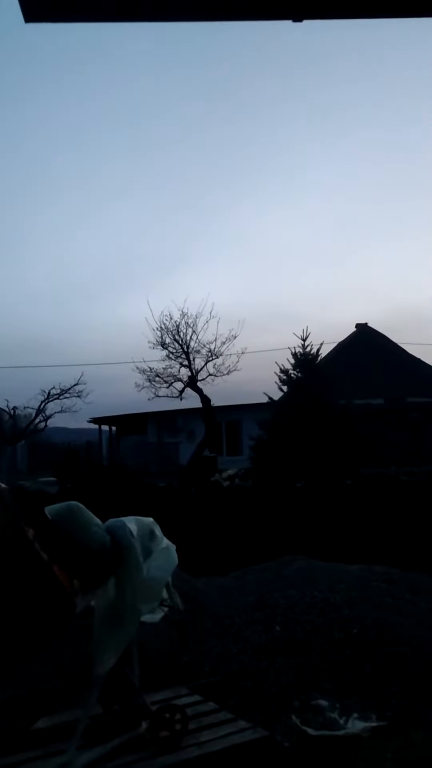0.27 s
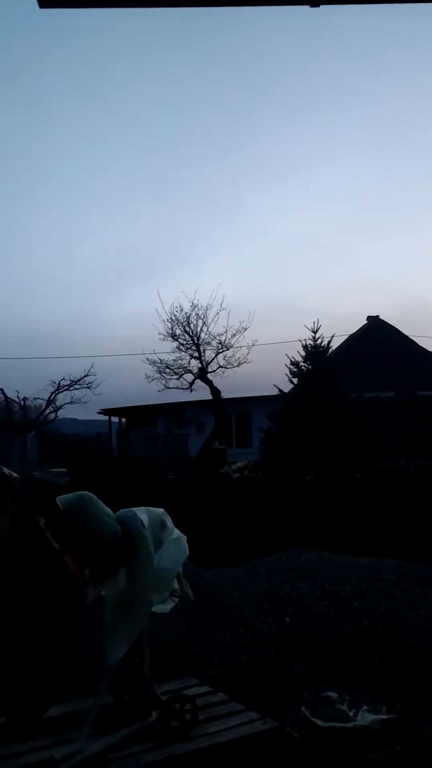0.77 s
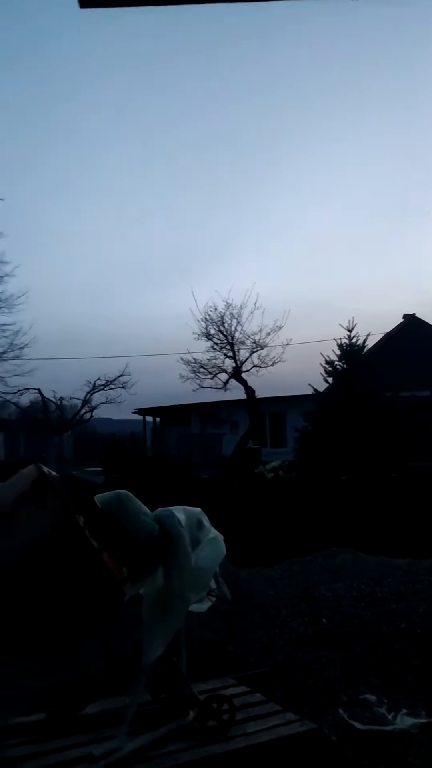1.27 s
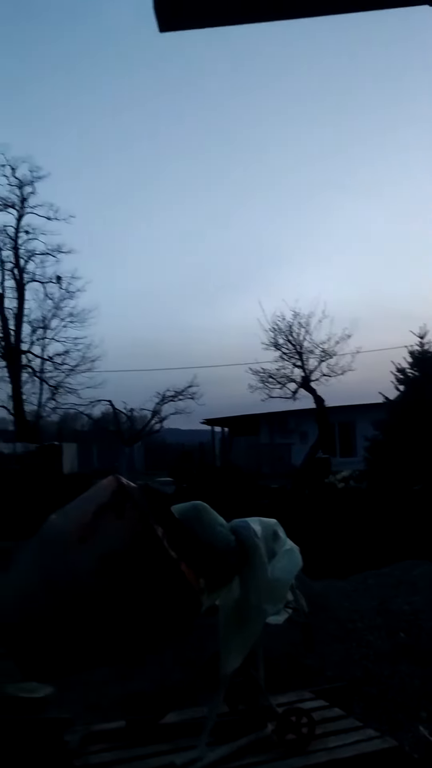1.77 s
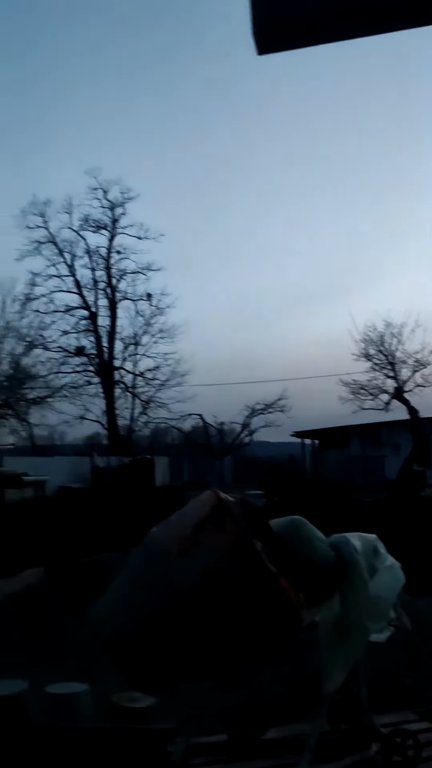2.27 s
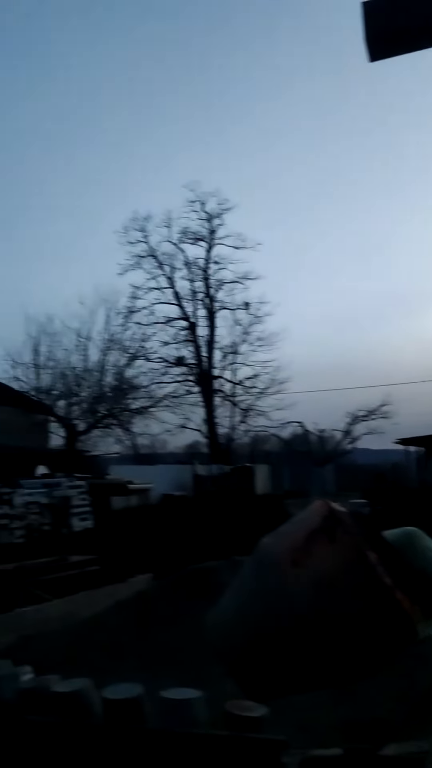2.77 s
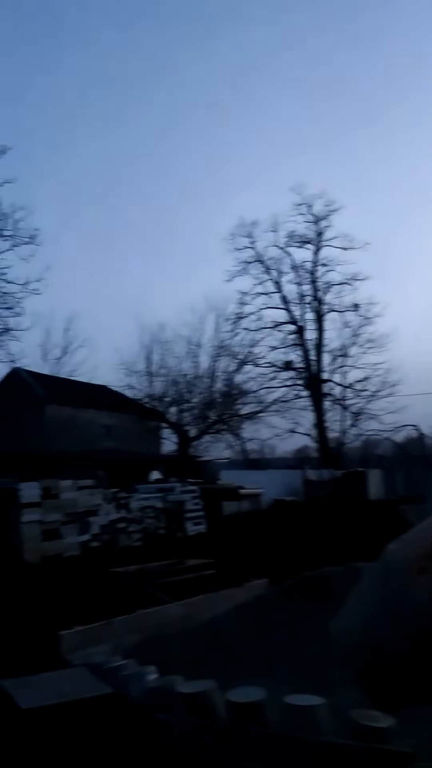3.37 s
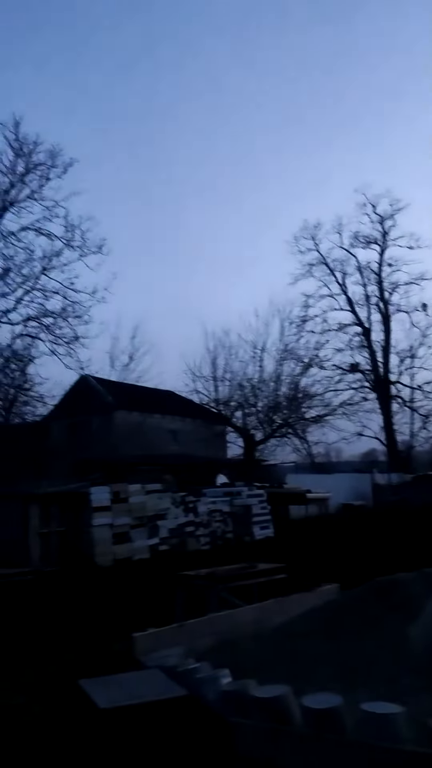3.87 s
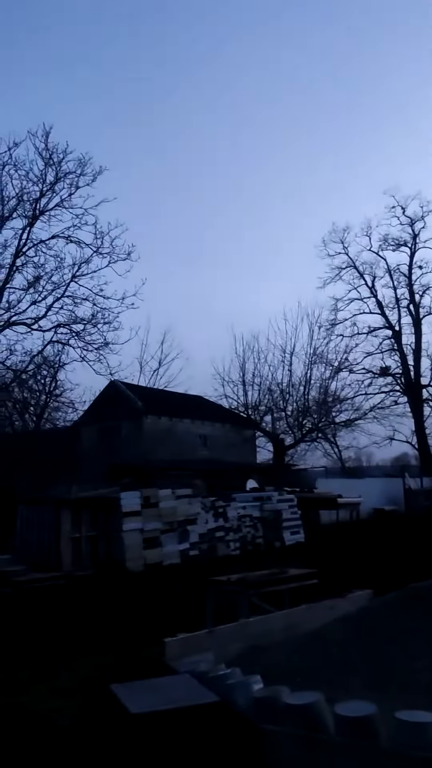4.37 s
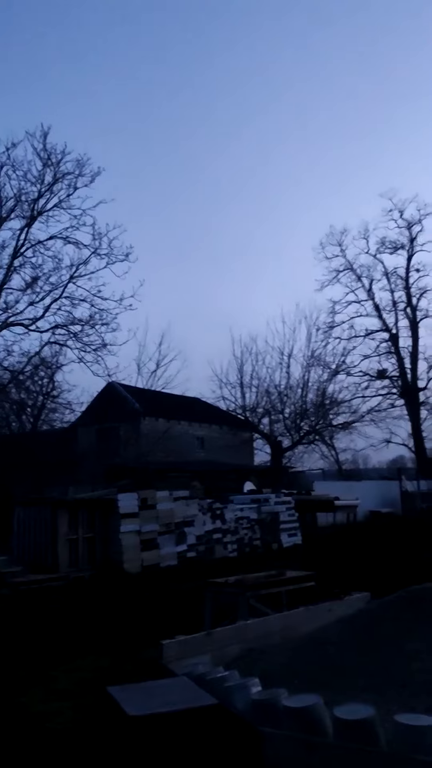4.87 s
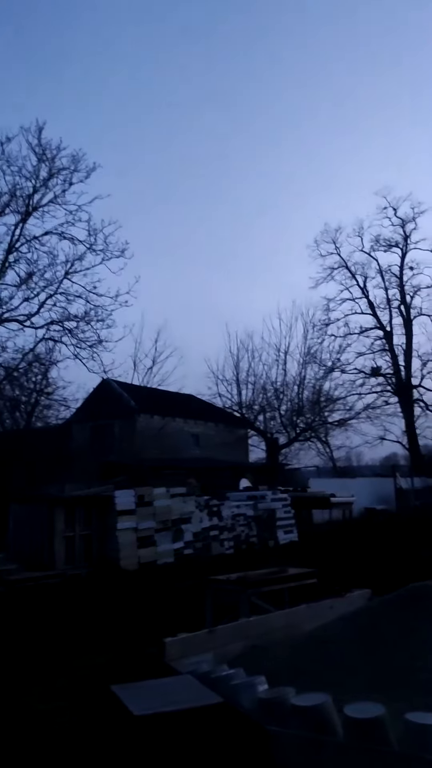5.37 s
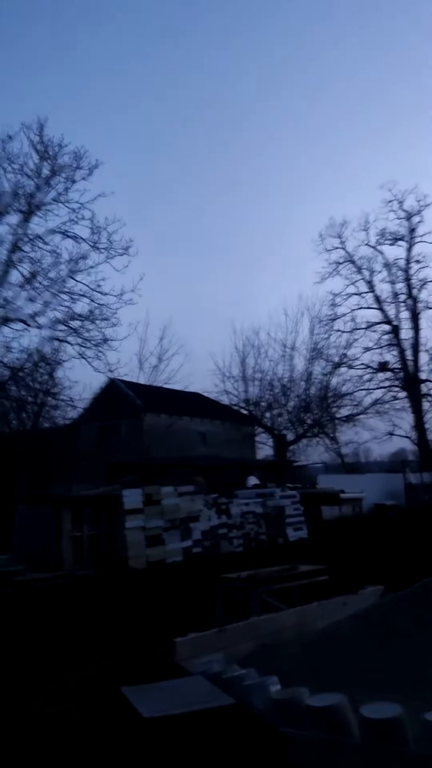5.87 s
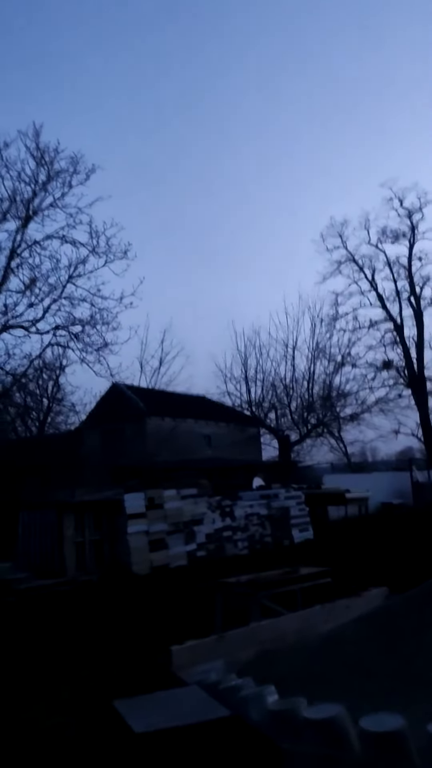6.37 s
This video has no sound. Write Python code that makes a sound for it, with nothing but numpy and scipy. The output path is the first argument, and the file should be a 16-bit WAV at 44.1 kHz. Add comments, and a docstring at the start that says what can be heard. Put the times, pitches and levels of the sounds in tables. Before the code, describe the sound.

Outdoors on a phone microphone, almost no background: only very faint hiss, low hum and flickering noise. A single nightingale gives a brief squeak, two long pure whistles sliding down, three ticked pairs of high-to-low plops, then a regular run of bouncing falling drops. A sharp, slowing high buzz takes over and a rough little up-and-down whistle ends the song, leaving a short, faint echo.

```python
"""In a yard at dusk a nightingale sings one phrase: a squeak, two falling whistles and three double drops, each
led by a tick, a trill, a high buzz and a last rasping slide. Notes are gliding sines with overtones that
grow with loudness; the buzz is a pulsed chirp and the rasp a set of side lines. Nearby walls and far
buildings echo the song. The phone samples slowly, so the treble is mirrored, and its noise suppressor turns
down faint sound and the ends of the echoes; noise bands, hum, rumble and hiss are faint beneath."""
import sys
import numpy as np
from scipy import signal
from scipy.fft import rfft, irfft
from scipy.io import wavfile
from scipy.ndimage import uniform_filter1d

SR = 44100
rng = np.random.default_rng(int(sys.argv[2]) if len(sys.argv) > 2 else 0)


def log_audio(samples):
    """Write samples as a 16-bit WAV file to the path given in sys.argv[1]."""
    # one column per channel
    frames = np.atleast_2d(samples).T
    # limit to full scale, then quantise
    limited = np.clip(frames, -1, 1)
    pcm = np.round(limited * 32767).astype(np.int16)
    wavfile.write(sys.argv[1], SR, pcm)


N = 292383  # samples


def from_db(db):
    """Level-amplitude relation: decibels to gain."""
    return 10 ** (np.asarray(db) / 20)


def in_time(rows, column):
    """Linear interpolation: one column of a curve at every sample."""
    return np.interp(np.arange(N) / SR, np.array(rows)[:, 0], np.array(rows)[:, column])


def at_hz(points, hz):
    """Logarithmic pitch scale: a spectrum read on a log-frequency axis."""
    points = np.array(points)
    return np.interp(np.log(np.maximum(hz, 1)), np.log(points[:, 0]), points[:, 1])


def drift(rate_hz, size):
    """Band-limited noise: smooth random change with a spread of about 1."""
    low_pass = signal.butter(4, rate_hz, fs=SR, output="sos")
    slow = signal.sosfilt(low_pass, rng.standard_normal(size + SR // 5))
    return slow[SR // 5:] / np.sqrt(2 * rate_hz / SR)  # without the filter's start


def band_pass(x, low_hz, high_hz, order):
    """Frequency selection: passes one band."""
    return signal.sosfilt(signal.butter(order, [low_hz, high_hz], "band", fs=SR, output="sos"), x)


# Low hum of the recorder: (frequency [Hz], rms level [dB])
HUM_LINES = [(37.7, -83), (75.4, -95)]
RUMBLE_DB, HISS_DB = -97, -99


def recorder_noise():
    """Self-noise: unsteady sines sharing one wavering clock, low-passed rumble and white hiss."""
    turns = np.arange(N) / SR + .004 * drift(3.5, size=N)
    hum = sum(np.sqrt(2) * from_db(db + 1.5 * drift(4, size=N)) * np.sin(2 * np.pi * hz * turns)
              for hz, db in HUM_LINES)
    rumble = from_db(RUMBLE_DB) * drift(160, size=N)
    return hum + rumble + from_db(HISS_DB) * rng.standard_normal(N)


# Faint flickering noise that leaks through the suppressor, with its level before it:
# (start [s], end [s], centre [Hz], width [Hz], level [dB])
LEAK_BANDS = [(0.064, 0.304, 1990, 443, -73.5), (0.276, 0.542, 970, 253, -74),
              (0.442, 1.069, 2040, 380, -68.5), (0.701, 1.049, 1495, 132, -76),
              (5.881, 6.095, 1870, 300, -71.5)]


def leaks():
    """Band-limited noise: narrow bands whose levels flicker."""
    out = np.zeros(N)
    for start, end, hz, width_hz, db in LEAK_BANDS:
        size, at = int((end - start) * SR), int(start * SR)
        noise = band_pass(rng.standard_normal(SR), hz - width_hz / 2, hz + width_hz / 2, order=3)[:size]
        level = from_db(db + 1.1 * drift(7.3, size=size))
        out[at:at + size] += level * signal.windows.tukey(size, .2) * noise / noise.std()
    return out


def taps(rows, size):
    """Impulse response of discrete reflections: the direct sound plus echoes as clicks."""
    out = np.zeros(size)
    out[0] = 1
    for s, db in rows:
        out[round(s * SR)] += from_db(db)
    return out


# Reflections close to the microphone: (delay [s], level [dB])
NEAR_ECHOES = [(.0033, -23.5), (.007, -22), (.0115, -17), (.0155, -24.5), (.019, -27.5), (.0235, -26),
               (.029, -38.5), (.062, -32.5)]
# Reflections from far walls, before their band filter: (delay [s], level [dB])
FAR_ECHOES = [(.168, -43.5), (.2271, -40), (.2379, -32.5), (.247, -40), (.4077, -29.5), (.4663, -44.5),
              (.603, -47.5)]
# Scattered sound, with late answers from two rows of buildings, before filtering:
# (delay [s], starting level [dB], decay time to -60 dB [s])
SCATTER_DECAYS = [(0, -40, 0.14), (0, -61.5, 1.76), (0.223, -61.5, 0.17), (.4, -70.5, 0.11)]
# Far walls return the middle of the song: (low edge [Hz], high edge [Hz])
WALL_BAND = [2200, 4400]
SCATTER_LOW_HZ, AIR_CUT_HZ = 900, 8200


def yard(x):
    """Image sources and diffuse decay: near walls echo each arrival; leaves and roofs scatter, air dulls."""
    t = np.arange(int(1.6 * SR)) / SR
    walls = taps(FAR_ECHOES, size=len(t))
    walls[0] = 0  # the direct sound is restored below, unfiltered
    spread = sum(from_db(db - 60 * (t - s) / t60) * np.clip((t - s) / 0.013, 0, 1)
                 for s, db, t60 in SCATTER_DECAYS)
    scattered = spread * rng.standard_normal(len(t))
    arrivals = band_pass(scattered, SCATTER_LOW_HZ, AIR_CUT_HZ, order=1)
    arrivals += band_pass(walls, *WALL_BAND, order=2)
    arrivals[0] = 1
    response = signal.fftconvolve(arrivals, taps(NEAR_ECHOES, size=SR // 10))
    return signal.fftconvolve(x, response)[:N]


ATTACK_FROM_DB = -21.5


def glide(start_hz, rest_hz, glide_s, attack_s, held_s, fade_db_per_s, length_s):
    """Exponential relaxation: pitch falls to rest; level rises, holds, then fades linearly in decibels."""
    s = np.linspace(0, length_s, num=100)
    attack = ATTACK_FROM_DB * np.maximum(1 - s / attack_s, 0)
    fade = fade_db_per_s * np.maximum(s - held_s, 0)
    hz = rest_hz + (start_hz - rest_hz) * np.exp(-s / glide_s)
    return np.transpose([s, hz, attack - fade])


# Levels of the second and third harmonic before growth and band shaping
OVERTONE_DB, THIRD_DB = -42, -48
OVERTONE_GROWTH = 0.45  # extra dB of overtone for each dB of note level
LONG_NOISE, SHORT_NOISE = .15, 0.81  # depth of noise modulation in the overtones of long and of short notes
ROUGH_SOFT, ROUGH_LOUD = .35, .05  # the same in the tone of ticks and pips, and of drops


def sing(shape, starts, overtone_noise, rough=0, detune=0.015):
    """Level-dependent harmonics: a gliding sine in row 0, its overtones in row 1, at each (time [s], level [dB])."""
    out = np.zeros((2, N))
    s, hz, db = np.transpose(shape)
    t = np.arange(int(s[-1] * SR)) / SR
    size = len(t)
    soft_ends = np.sin(np.pi / 2 * np.clip(np.minimum(t / .0014, (s[-1] - t) / .003), 0, 1)) ** 2
    turns = np.cumsum(np.interp(t, s, hz)) / SR
    envelope = soft_ends * uniform_filter1d(from_db(np.interp(t, s, db)), size=size // 40 + 1)
    for (at_s, level_db), (tune, phase) in zip(starts, rng.standard_normal((len(starts), 2))):
        angle = 2 * np.pi * (turns * (1 + detune * tune) + phase)
        gain = from_db(level_db) * envelope
        tone = np.sin(angle) * (1 + rough * drift(150, size=size))
        overtones = from_db(OVERTONE_DB) * np.sin(2 * angle) + from_db(THIRD_DB) * np.sin(3 * angle)
        overtones = overtones * gain ** OVERTONE_GROWTH * (1 + overtone_noise * drift(500, size=size))
        at = round(at_s * SR)
        out[:, at:at + size] += gain * [tone, overtones]
    return out


# Bands that shape the overtones of short notes: (centre [Hz], width [Hz], gain [dB])
SHORT_NOTE_BANDS = [(4380, 950, -0.5), (5780, 440, 1.5), (6770, 440, 4), (7400, 350, -1.5),
                    (8700, 1000, -10)]
# Bands that shape the overtones of long notes: (centre [Hz], width [Hz], gain [dB])
LONG_NOTE_BANDS = [(5650, 650, 6), (7400, 770, 9), (8500, 700, 5)]
FLUTTER_DB = 1.13  # spread of the breath's level
HAZE_DB, HAZE_T60_S = -37, 0.55


def colour(notes, bands):
    """Spectral shaping: bands shape the overtones, a faint treble haze of noise follows; breath flutters the tone."""
    overtones = sum(from_db(db) * band_pass(notes[1], hz - width_hz / 2, hz + width_hz / 2, order=3)
                    for hz, width_hz, db in bands)
    t = np.arange(SR // 2) / SR
    haze = from_db(HAZE_DB - 60 * t / HAZE_T60_S) * rng.standard_normal(len(t))
    overtones += signal.fftconvolve(overtones, haze)[:N]
    return notes[0] * from_db(FLUTTER_DB * drift(110, size=N)) + overtones


# Opening squeak: (time [s], pitch [Hz], level [dB])
SQUEAK_SHAPE = [(0, 4755, -67), (.008, 4400, -42), (.016, 4010, -31), (.028, 3922, -30),
                (.033, 4350, -27.5), (.036, 5210, -31.5), (.039, 6240, -38)]


def squeak():
    """Frequency modulation: the pitch dips, then sweeps up."""
    return sing(SQUEAK_SHAPE, [(.542, 0)], LONG_NOISE, detune=0)


# Tick: (start pitch [Hz], resting pitch [Hz], glide constant [s], attack [s], held until [s],
# fade [dB/s], length [s]); the drops and pip below have the same columns
TICK_SHAPE = (2700, 1880, .002, 0.0014, 0.0036, 2900, 0.0093)
# When ticks sound: (time [s], level [dB])
TICK_TIMES = [(0.828, -49.5), (1.438, -25.5), (2.1415, -18.5), (2.5487, -18), (2.9034, -16)]


def ticks():
    """Damped transient: a very short falling pip leads each whistle and each double drop."""
    return sing(glide(*TICK_SHAPE), TICK_TIMES, SHORT_NOISE, ROUGH_SOFT)


# Two whistle openings, each a list of (time [s], pitch [Hz], relative level [dB])
WHISTLE_OPENINGS = [
    [(0, 3806, -56.5), (.012, 3762, -21.5), (.031, 3836, -15.5), (.052, 3790, -10.5), (.064, 3645, -24.5)],
    [(0, 3856, -34), (.012, 3798, -18), (.03, 3660, -8), (.042, 3586, -13.5), (.068, 3577, -12.5),
     (.078, 3616, -24)],
]
# The fall both run into: (time [s], pitch [Hz], relative level [dB])
SHARED_FALL = [(0.112, 3493, -26.5), (0.148, 3260, -26), (.18, 2918, -10), (.2, 2720, -9.5),
               (.212, 2380, -7), (.22, 2025, -19.5), (0.226, 1789, -28.5)]
# When they sound: (time [s], level [dB], length of the fall [share])
WHISTLE_TIMES = [(.979, -2.5, 0.96), (1.61, 0.0, 1)]


def whistles():
    """Near-sinusoidal phonation: each opening runs into one falling glide, its length scaled."""
    out = np.zeros((2, N))
    first = SHARED_FALL[0][0]
    for opening, (at, db, share) in zip(WHISTLE_OPENINGS, WHISTLE_TIMES):
        fall = [(first + share * (s - first), hz, level) for s, hz, level in SHARED_FALL]
        out += sing(opening + fall, [(at, db)], LONG_NOISE, detune=0)
    return out


# Columns as for the tick
HIGH_DROP_SHAPE = (3660, 2293, .0024, .0028, .008, 1100, 0.013)
LOW_DROP_SHAPE = (2040, 944, 0.01, 0.0018, .006, 1390, 0.072)
# When the pairs sound: (time of the high drop [s], level [dB])
DOUBLE_TIMES = [(2.238, -7), (2.6473, -6.5), (3.0012, -7)]
LOW_AFTER_S, LOW_DB = .0245, -4  # low drop relative to the high one


def double_drops():
    """Successive relaxation: a high falling note, then a low one."""
    low_times = np.add(DOUBLE_TIMES, (LOW_AFTER_S, LOW_DB))
    high = sing(glide(*HIGH_DROP_SHAPE), DOUBLE_TIMES, SHORT_NOISE, ROUGH_LOUD)
    return high + sing(glide(*LOW_DROP_SHAPE), low_times, SHORT_NOISE, ROUGH_LOUD)


# Columns as for the tick
PIP_SHAPE = (1900, 1099, .0028, .001, .003, 220, 0.024)
TRILL_DROP_SHAPE = (3404, 925, .0076, 0.0027, 0.005, 1830, 0.062)
# When the trill's drops sound: (time [s], level [dB])
TRILL_TIMES = [(3.2405, -6), (3.4205, -5), (3.5994, -5), (3.771, -5), (3.9424, -5.5), (4.1164, -5),
               (4.296, -5.5), (4.4739, -6), (4.6503, -6), (4.835, -5.5), (5.0158, -5.5)]
PIP_BEFORE_S, PIP_DB = .043, -24  # pip relative to its drop


def trill():
    """Rhythmic repetition: a soft pip before each falling drop."""
    pip_times = np.add(TRILL_TIMES, (-PIP_BEFORE_S, PIP_DB))
    pips = sing(glide(*PIP_SHAPE), pip_times, SHORT_NOISE, ROUGH_SOFT)
    return pips + sing(glide(*TRILL_DROP_SHAPE), TRILL_TIMES, SHORT_NOISE, ROUGH_LOUD)


# One pulse: (time [s], pitch [Hz], relative level [dB])
PULSE_SHAPE = [(0, 7500, -7), (.0015, 6652, 4.5), (.0024, 5744, 6), (.003, 5936, -16), (.0038, 6300, -9),
               (.006, 6594, -8.5), (.0095, 6445, -21.5)]
# Strength: (time [s], pulse level [dB], depth of the dip under the resting pitch [1 = full])
BUZZ_STRENGTH = [(5.16, -15.5, 0.1), (5.19, -16.5, 0.21), (5.216, -24.5, 0.3), (5.576, -18, 0.75),
                 (5.64, -19, 1.05), (5.704, -22, 0.787), (5.78, -30.5, 0.56)]
# The gap between pulses grows from the first towards the last value
BUZZ_START_S, BUZZ_PULSES = 5.1577, 77
FIRST_GAP_S, LAST_GAP_S, SLOWING_PULSES = .005953, .010106, 42.72
BUZZ_REST_HZ = 6315
BUZZ_RING_HZ, BUZZ_RING_DB = 119, -3  # width and level of the windpipe's ring


def buzz():
    """Pulsed self-oscillation: the syrinx chirps down on each pulse, one band passes, the windpipe rings."""
    k = np.arange(BUZZ_PULSES)
    early = (LAST_GAP_S - FIRST_GAP_S) * SLOWING_PULSES * (1 - np.exp(-k / SLOWING_PULSES))
    at = BUZZ_START_S + LAST_GAP_S * k - early + .0002 * rng.standard_normal(BUZZ_PULSES)
    t = np.arange(N) / SR
    pulse = np.clip(np.searchsorted(at, t) - 1, 0, None)
    since = t - at[pulse]
    sounding = (t > at[0]) & (t < at[-1] + .008)
    s, hz, db = np.transpose(PULSE_SHAPE)
    hz = np.interp(since, s, hz)
    hz = hz - (1 - in_time(BUZZ_STRENGTH, column=2)) * np.minimum(hz - BUZZ_REST_HZ, 0)
    hz = uniform_filter1d(hz, size=12) * (1 + .006 * drift(200, size=N))
    db = np.interp(since, s, db) + in_time(BUZZ_STRENGTH, column=1)
    db = db + .8 * rng.standard_normal(len(at))[pulse] + 1.2 * drift(250, size=N)
    envelope = uniform_filter1d(sounding * from_db(db), size=12)
    voice = envelope * np.sin(2 * np.pi * np.cumsum(hz) / SR)
    buzz_band = signal.cheby2(6, 60, [5150, 8500], "band", fs=SR, output="sos")
    out = signal.sosfilt(buzz_band, voice)
    ring = signal.lfilter(*signal.iirpeak(BUZZ_REST_HZ, BUZZ_REST_HZ / BUZZ_RING_HZ, SR), out)
    return out + from_db(BUZZ_RING_DB) * ring


# Last slide: (time [s], pitch [Hz], level [dB])
SLIDE_SHAPE = [(0, 2220, -61), (.012, 2760, -30.5), (.022, 3554, -15), (.029, 3710, -8), (.078, 2690, -9.5),
               (.085, 2757, -29), (.088, 2648, -52)]


def slide():
    """Frequency modulation: a rising, then falling whistle."""
    return sing(SLIDE_SHAPE, [(5.887, 0)], LONG_NOISE, detune=0)


# The rasp that opens the slide: (time [s], level of the lines before colour [dB])
RASP_LEVEL = [(5.885, -50), (5.893, -30), (5.906, -23.5), (5.92, -34.5), (5.93, -63)]
# Colour of the lines: (frequency [Hz], gain [dB])
RASP_SPECTRUM = [(1500, -40), (2500, -7.5), (3500, -4.5), (5000, 3.5), (6800, -5), (8000, -16), (9200, -31)]
RASP_SPACING_HZ, RASP_WOBBLE_HZ = 773, 128


def rasp():
    """Sideband principle: a second vibration chops the slide's start into evenly spaced, unsteady lines."""
    t = np.arange(RASP_LEVEL[0][0], RASP_LEVEL[-1][0], 1 / SR)
    size, at = len(t), round(t[0] * SR)
    carrier_hz = np.interp(t - RASP_LEVEL[0][0], *np.transpose(SLIDE_SHAPE)[:2])
    out = np.zeros(N)
    for k in range(-2, 8):
        hz = carrier_hz + k * RASP_SPACING_HZ + RASP_WOBBLE_HZ * drift(260, size=size)
        gain = from_db(at_hz(RASP_SPECTRUM, hz) + 1.7 * drift(140, size=size))
        out[at:at + size] += gain * np.sin(2 * np.pi * np.cumsum(hz) / SR)
    return out * from_db(in_time(RASP_LEVEL, column=1))


def scene():
    """Superposition: the bird's notes ring in the yard, and the faint noise bands are added."""
    long_notes = colour(squeak() + whistles() + slide(), LONG_NOTE_BANDS)
    short_notes = colour(ticks() + double_drops() + trill(), SHORT_NOTE_BANDS)
    bird = long_notes + short_notes + buzz() + rasp()
    return (yard(bird) + leaks())[None]


# The phone's output filter around half its rate: (frequency [Hz], gain [dB])
OUTPUT_FILTER = [(7000, 0.0), (7700, -4.5), (8000, -10), (8500, -9), (9200, -20), (9900, -29), (10400, -53),
                 (11000, -130)]
PHONE_RATE_HZ = 16000


def mirrored(x):
    """Aliasing: sampling folds the spectrum about half the rate; the output filter leaks some of the image."""
    x = signal.sosfilt(signal.butter(8, 8800, fs=SR, output="sos"), x)
    both = x * (1 + 2 * np.cos(2 * np.pi * PHONE_RATE_HZ * np.arange(N) / SR))
    response = from_db(at_hz(OUTPUT_FILTER, np.fft.rfftfreq(N, 1 / SR)))
    return irfft(rfft(both) * response, N)


# Level under which the suppressor turns a band down: (frequency [Hz], level [dB])
GATE_LEVEL = [(300, -98), (1000, -93), (2500, -87), (3800, -92), (4500, -104), (9000, -104)]
GATE_DEPTH_DB = -44


def suppress(x):
    """Spectral gating: narrow bands are turned down as their smoothed power nears or falls below the gate."""
    hz, _, spec = signal.stft(x, SR, nperseg=1024, noverlap=768)
    power = uniform_filter1d(abs(spec) ** 2, size=5, axis=-1)  # over time
    power = uniform_filter1d(power, size=3, axis=-2)  # over frequency
    gate_power = from_db(at_hz(GATE_LEVEL, hz))[:, None] ** 2
    keep = np.clip(1 - gate_power / (power + 1e-20), 0, 1)
    kept = spec * np.maximum(keep, from_db(GATE_DEPTH_DB))
    return signal.istft(kept, nperseg=1024, noverlap=768)[1][..., :N]


MIC_CUT_HZ, CUTOFF_HZ = 850, 10993


def record(dry):
    """Transmission chain: thin bass, mirrored treble, suppression, self-noise, then a steep top cut."""
    high = signal.sosfilt(signal.butter(4, MIC_CUT_HZ, "high", fs=SR, output="sos"), dry)
    thin = dry * 0.25 + high
    out = suppress(mirrored(thin)) + recorder_noise()
    return signal.sosfilt(signal.cheby2(12, 60, CUTOFF_HZ, fs=SR, output="sos"), out)


dry = scene()
out = record(dry)
log_audio(out)
```